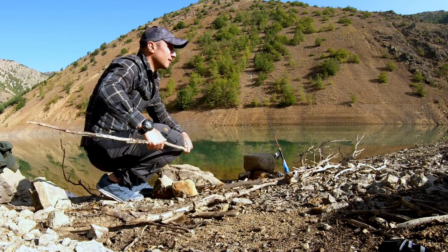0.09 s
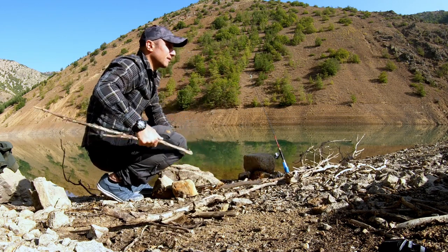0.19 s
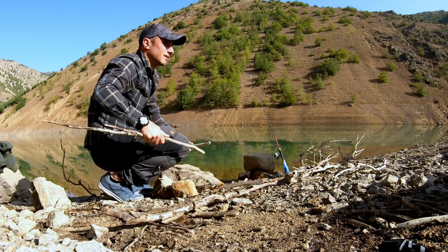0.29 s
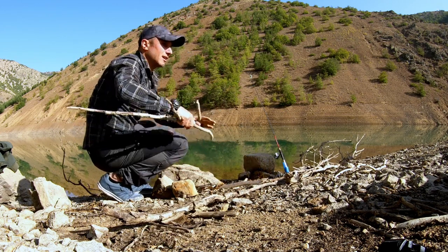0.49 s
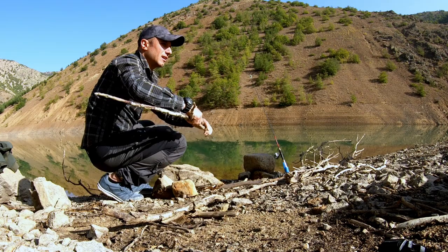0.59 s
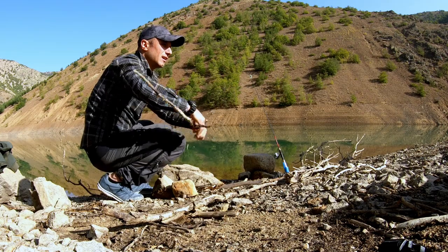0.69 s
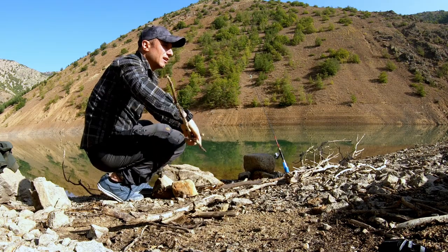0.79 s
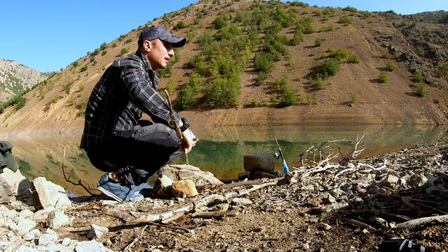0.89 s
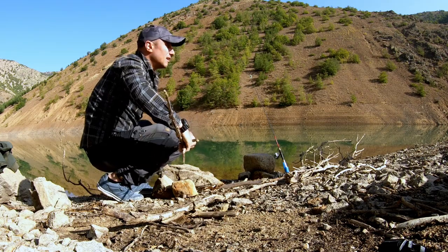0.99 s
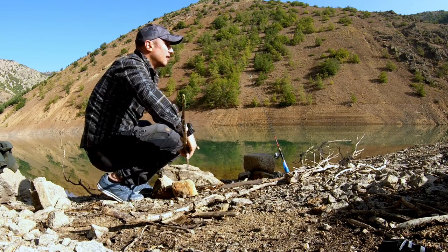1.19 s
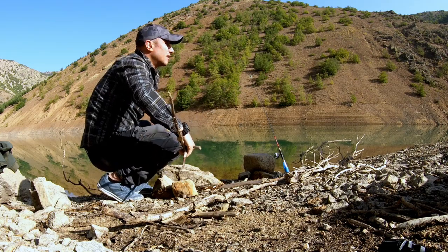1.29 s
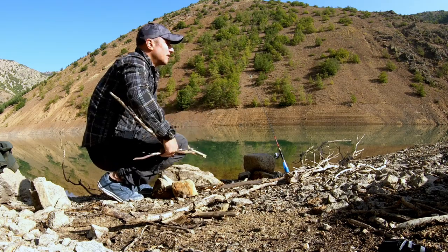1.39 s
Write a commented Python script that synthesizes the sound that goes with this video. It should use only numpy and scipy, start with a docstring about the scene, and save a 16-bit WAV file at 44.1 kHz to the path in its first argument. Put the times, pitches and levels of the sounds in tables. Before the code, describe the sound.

Two sharp cracks of dry wood snapped by hand outdoors, then soft ticking and rustling.

```python
"""A crouching man snaps dry sticks by hand, close by, on a stony lake shore.
First his jacket rustles over the quiet open air. A thin stick cracks, then a thick one: fibres tear,
the wood gives way and rings, and the stones throw back a short echo. A held piece knocks dully.
Last, a stick slides through his hand. Splinters and bark tick and hands bump softly along the way."""
import sys
import numpy as np
from scipy import signal
from scipy.io import wavfile

SR = 44100
rng = np.random.default_rng(int(sys.argv[2]) if len(sys.argv) > 2 else 0)


def waveform_to_disk(signal):
    """Save audio, clipped to [-1, 1], as 16-bit WAV at the path in sys.argv[1]."""
    frames = np.transpose(np.atleast_2d(signal))
    scaled = np.clip(frames, -1, 1) * 32767
    samples = np.round(scaled).astype(np.int16)
    wavfile.write(sys.argv[1], SR, samples)


N = 61740  # 1.4 seconds
LEAD = SR // 250  # samples of room for a ring to swell

# The tones of each piece of wood. Each row: pitch in Hz, width in Hz, peak in dB, left over right in dB.
WOOD_TONES = { "thin": [(420, 800, -18, 0), (720, 520, -18.5, -3), (1380, 600, -20, -0.5),
              (2640, 600, -6.5, -1), (3440, 420, -3, 1), (4030, 250, -6, 2), (4480, 400, 1.5, 1.5),
              (5220, 620, 1, 0), (5880, 262, -4, 2), (6400, 340, -6, -0.5), (7150, 650, -13, -1),
              (9000, 1300, -17.5, -1), (10190, 900, -17, 2)], "thick": [(720, 280, -12.5, 1),
              (870, 380, -9, -7.5), (1260, 280, -7, 1), (1580, 370, -7.5, -8.5), (2250, 320, 4, -6),
              (2600, 340, -5.5, -12), (3260, 320, -3.5, -7.5), (3820, 330, -6, 0.5), (4450, 260, -9.5, -7),
              (5160, 320, -10, 10), (6090, 730, -0.5, -1.5), (7700, 640, -11.5, 4), (9090, 700, -18, 10),
              (10100, 740, -16, 3)], "held": [(226, 154, -0.5, -3), (430, 170, -1.5, 4.5),
              (760, 240, 6.5, -2.5), (1260, 175, -0.5, -5.5), (2010, 480, -7, 5), (3240, 760, -0.5, 0),
              (3700, 300, -1, 2), (4200, 880, 1, 2.5), (6000, 550, -6, 1), (6700, 730, -4, -4),
              (9350, 2700, -15, -6)]}
# The sound between those tones. Each row: frequency in Hz, level in dB.
CRACK_COLOUR = [(40, -48), (150, -37), (500, -32), (2000, -29), (10300, -22.5), (11400, -37),
                (14000, -41.5), (16000, -53.5)]
def wood_ring(tones, brightness_db, size=4096):
    """One push makes wood ring with many tones at once; a sharper push sounds brighter."""
    hz = abs(np.fft.fftfreq(size, 1 / SR))
    power = spectrum(CRACK_COLOUR, hz) ** 2
    for tone_hz, width_hz, db, pan_db in tones:
        peak = amp(db + np.array([[.5], [-.5]]) * pan_db)
        off_pitch = (hz ** 2 - tone_hz ** 2) / (width_hz * hz + 1)
        power = power + (peak / (1 + off_pitch ** 2)) ** 2
    octaves = np.log2(np.maximum(hz, 700) / 3500)
    return response(np.sqrt(power) * amp(brightness_db * octaves), sudden=0.62)


def fracture(build_s, dying_s, fibres_db, fibres_per_s=7100):
    """Fibres tear ever harder, the wood gives way, the last ones follow. Gives head start and force."""
    lead = SR // 50
    t = np.arange(-lead, 3 * lead) / SR
    swell = np.exp(-abs(t) / np.where(t < 0, build_s, dying_s))
    fibres = grains(len(t), fibres_per_s, spread=0.42) * swell * (t != 0)
    no_bass = signal.butter(1, 1100, "high", fs=SR, output="sos")  # fibres are too small to push bass
    force = amp(fibres_db) * unit(signal.sosfilt(no_bass, fibres))
    force[:, lead] += 1  # the snap itself
    return (lead + LEAD) / SR, force


# Breaks and a knock. Each row: which wood, time in seconds, strength in dB, build-up in seconds,
# fade in seconds, tearing fibres in dB, brightness in dB per octave.
BREAKS = [("thin", .2109, -6.5, .0007, .0012, -1, .4), ("thin", .2221, 16.77, .0005, .0014, -6.5, -.1),
          ("thin", .22305, 13.1, .0003, .0014, 6.5, 0), ("thick", .5417, 1, 0.0014, 0.0011, 1, -3),
          ("thick", .5431, 5.3, 0.0032, 0.00098, 1.8, -0.97),
          ("thick", .5452, 10.53, 0.00061, 0.0013, -1.8, 0.74),
          ("held", .6415, -7.5, 0.0011, .0072, 8.6, -0.33)]
def sticks(scatter_s=.0012, scatter_db=-10):
    """Each break rings the wood; the crack scatters off hands and knees, differently on each side."""
    out = np.zeros((2, N))
    t = np.arange(SR // 50) / SR
    for wood, s, db, build_s, dying_s, fibres_db, brightness_db in BREAKS:
        lead_s, force = fracture(build_s, dying_s, fibres_db)
        scatter = unit(stereo_noise(len(t), 0.92) * t ** 2 * np.exp(-2 * t / scatter_s))
        paths = (t == 0) + amp(scatter_db) * scatter
        ring = wood_ring(WOOD_TONES[wood], brightness_db)
        crack = unit(convolve(convolve(force, paths), ring))
        loudness = amp(db) * np.linalg.norm(ring, axis=1, keepdims=True)
        add(out, s - lead_s, loudness * crack)
    return out


# Splinters and bark. Each row: time in seconds, strength in dB, pitch in Hz, fade in seconds, ring in dB.
TICKS = [(.2011, -29, 4300, .0008, 8), (.237, -21, 4400, 0.00066, 9), (.265, -28, 6700, 0.0016, 12),
         (.288, -22.5, 6600, .0018, 2), (0.2954, -26.5, 4850, .0008, 11), (0.2985, -24, 3000, .0018, 1),
         (0.3078, -24.5, 4500, .0008, 19), (.3198, -29, 4140, 0.00051, 16), (0.6511, -27, 3960, .0008, 3),
         (0.691, -20.5, 3300, 0.00084, 16), (0.692, -25.5, 4830, 0.00038, 18),
         (0.7036, -30, 3280, .0006, 17), (.7388, -28, 6400, 0.0032, 8), (0.7586, -19, 3220, 0.00066, 1),
         (.785, -30, 3570, 0.0022, 13), (.824, -28.5, 3700, 0.00066, -3), (0.8739, -28.5, 4930, 0.0013, 4),
         (.904, -29.5, 3650, .0015, 17), (.91, -27.5, 3640, .0018, 21), (.9613, -31.5, 4500, .0024, 6),
         (0.9995, -30, 2720, .002, 12), (1.044, -33, 4740, .001, 15), (1.0872, -37, 5000, .0018, 9.5),
         (1.151, -38.5, 3100, .001, 22), (1.1978, -37, 4960, 0.0021, 21), (1.247, -41, 4000, .004, 6),
         (1.2914, -35, 3600, .0018, 22)]
# The tone all ticks share. Each row: frequency in Hz, level in dB.
TICK_COLOUR = [(100, -29.5), (750, -13), (1700, -11.5), (3200, -3), (6500, -3), (7800, -6.5), (10200, -7),
               (12000, -24), (16000, -34.5)]
def splinters():
    """Tiny breaks tick, each with one broad tone; the shortest ticks are the driest."""
    out = np.zeros((2, N))
    for s, db, hz, dying_s, ring_db in TICKS:
        lead_s, force = fracture(build_s=0.00039, dying_s=dying_s, fibres_db=5)
        ring = colour(TICK_COLOUR, hz, width_hz=.9 / dying_s, peak=amp(ring_db))
        add(out, s - lead_s, amp(db) * unit(convolve(force, ring)))
    return out


# Soft bumps. Each row: start in seconds, strength in dB, pitch in Hz, fade in seconds.
BUMPS = [(.072, -41.5, 1460, 0.0026), (.265, -36.5, 304, 0.043), (.288, -34, 760, 0.018),
         (.349, -40, 960, 0.004), (.418, -35.5, 1470, 0.0058), (.655, -37.5, 776, 0.0028),
         (.874, -44, 1170, 0.0027), (1.17, -41.5, 180, 0.023), (1.292, -48, 740, 0.0026),
         (1.311, -39, 230, .012)]
def bumps(damping=0.16):
    """Soft pushes, mostly hands and wood meeting, ring dully and die fast."""
    out = np.zeros((2, N))
    t = np.arange(SR // 15) / SR
    for s, db, hz, dying_s in BUMPS:
        push = stereo_noise(len(t)) * np.exp(-t / dying_s)
        ring = np.exp(-np.pi * damping * hz * t) * np.sin(2 * np.pi * hz * t)
        add(out, s, amp(db) * unit(convolve(push, ring)))
    return out


# How hard sleeves and bark rub. Each row: time in seconds, level in dB.
RUB_LEVELS = [(0, -61), (0.058, -59.5), (0.086, -77.5), (.11, -66), (.14, -79.5), (0.181, -78),
              (0.206, -56), (.28, -58), (0.322, -53.5), (0.389, -69.5), (.412, -63.5), (.44, -74.5),
              (0.518, -77), (0.544, -48), (.575, -57), (.6, -67), (.67, -62), (.78, -53), (0.831, -51.5),
              (.892, -64), (.915, -56), (.945, -70), (0.964, -57), (1.02, -69), (1.131, -75.5), (1.28, -76),
              (1.325, -69), (1.36, -76)]
# The tone of the rubbing. Each row: frequency in Hz, level in dB.
RUB_COLOUR = [(100, -33), (250, -19), (500, -18.5), (800, -19.5), (1400, -15), (2100, -13.5), (2700, -10),
              (3550, 2), (4500, -2.5), (5300, -4), (6500, 1.5), (7900, -7.5), (9700, -4), (11500, -18.5),
              (14000, -13.5), (16000, -38)]
def rustle(fizz_hz=10700, fizz_full_db=-53.5):
    """Cloth and bark make countless small slips, some coarser; harder rubbing is brighter."""
    coarse = amp(-1.5) * evened(grains(N, per_s=1000))
    slips = evened(stereo_noise(N)) + coarse
    rubbing = evened(convolve(slips, colour(RUB_COLOUR))[:, LEAD:LEAD + N])
    level_db = np.interp(np.arange(N) / SR, *np.transpose(RUB_LEVELS))
    body = signal.sosfiltfilt(signal.butter(4, fizz_hz, fs=SR, output="sos"), rubbing)
    fizz = (rubbing - body) * amp(level_db - fizz_full_db)
    return amp(level_db) * (body + fizz)


# How loud the sliding stick is. Each row: time in seconds, level in dB.
SLIDE_LEVELS = [(.72, -80), (.84, -69.5), (1, -72.5), (1.095, -66), (1.21, -87.5)]
# The tones of that stick. Each row: pitch in Hz, width in Hz, relative level in dB.
SLIDE_TONES = [(1725, 150, -1), (2087, 260, 0.5)]
def slide():
    """Bark catches on the palm in many small slips that ring two tones of the stick."""
    slips = grains(N, per_s=900)
    ring = np.zeros((2, N))
    for hz, width_hz, db in SLIDE_TONES:
        ring += amp(db) * evened(band(slips, hz - width_hz / 2, hz + width_hz / 2))
    level_db = np.interp(np.arange(N) / SR, *np.transpose(SLIDE_LEVELS), left=-np.inf, right=-np.inf)
    return amp(level_db) * evened(ring)


# Echo off the stones. Each row: low edge in Hz, high edge in Hz, seconds to fade by 60 dB, level in dB.
STONE_ECHOES = [(120, 600, 0.063, -22), (599, 2200, .06, -21), (2600, 16000, .055, -21)]
def echo(x, delay_s=0.0018, shore_fade_s=.35, shore_db=-33):
    """Sound bounces quickly off nearby stones, and the shore adds a faint tail."""
    t = np.arange(SR // 2) / SR
    tail = amp(shore_db) * unit(stereo_noise(len(t), 0.8) * amp(-60 * t / shore_fade_s))
    for low_hz, high_hz, fade_s, db in STONE_ECHOES:
        bounces = stereo_noise(len(t), 0.7) * (t > delay_s) * amp(-60 * t / fade_s)
        tail += amp(db) * unit(band(bounces, low_hz, high_hz))
    return convolve(x, tail)[:, :N]


# The tone of the open air. Each row: frequency in Hz, relative level in dB.
AIR_COLOUR = [(25, -7.5), (50, -12.5), (110, -12), (135, -5.5), (165, 5), (230, -4), (360, -1), (520, -10),
              (800, -1.5), (1100, -9.5), (2000, -12), (4000, -18.5), (9000, -29), (12000, -27),
              (16000, -39.5)]
def air(level_db=-69):
    """The open shore makes a faint, steady wash."""
    wash = convolve(stereo_noise(2 * N, spread=1), colour(AIR_COLOUR, size=8192))
    return amp(level_db) * evened(wash[:, N:2 * N])


def amp(db):
    return 10 ** (np.asarray(db) / 20)


def evened(x):
    """Scales a sound to an average power of 1."""
    return x / np.sqrt(np.mean(x ** 2) + 1e-20)


def unit(x):
    """Scales each channel to a total energy of 1."""
    return x / np.sqrt(np.sum(x ** 2, axis=-1, keepdims=True) + 1e-20)


def add(mix, s, sound):
    part = mix[:, max(round(s * SR), 0):][:, :sound.shape[1]]
    part += sound[:, :part.shape[1]]


def convolve(x, ring):
    return signal.fftconvolve(np.atleast_2d(x), np.atleast_2d(ring), axes=1)


def band(x, low_hz, high_hz):
    return signal.sosfilt(signal.butter(2, [low_hz, high_hz], "band", fs=SR, output="sos"), x)


def stereo_noise(size, spread=0.17):
    """Hiss for left and right; more spread sounds wider."""
    mid, side = rng.standard_normal((2, size))
    return np.array([mid + spread * side, mid - spread * side])


def grains(size, per_s, spread=0.17):
    """Tiny clicks at random moments."""
    return stereo_noise(size, spread) * (rng.random(size) < per_s / SR)


def spectrum(points, hz):
    """Reads the gain at these frequencies from rows of Hz and dB."""
    points_hz, db = np.transpose(points)
    return amp(np.interp(np.log(hz + 1), np.log(points_hz), db))


def response(gain, sudden=1):
    """A ring with this spectrum: it starts at once if sudden is 1, and swells first if less."""
    phase = -signal.hilbert(np.log(gain)).imag
    ring = np.fft.ifft(gain * np.exp(1j * sudden * phase)).real
    return np.roll(ring, LEAD, axis=-1)


def colour(points, peak_hz=1000, width_hz=1, peak=0, size=2048):
    """A filter shaped by rows of Hz and dB, with one ringing tone if wanted."""
    hz = abs(np.fft.fftfreq(size, 1 / SR))
    tone = peak / (1 + (2 * (hz - peak_hz) / width_hz) ** 2)
    return response(spectrum(points, hz) * (1 + tone))


def scene():
    """The cracking wood and its echo, over the softer sounds."""
    wood = sticks() + splinters()
    return wood + echo(wood) + bumps() + slide() + rustle() + air()


def record(dry, top_hz=16200):
    """The microphone loses the very highest treble."""
    low_pass = signal.firwin(511, top_hz, window=("kaiser", 9), fs=SR)
    return signal.oaconvolve(dry, low_pass[None], "same")


dry = scene()
out = record(dry)
waveform_to_disk(out)
```